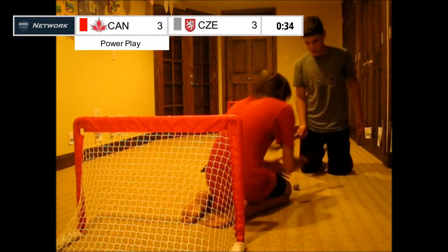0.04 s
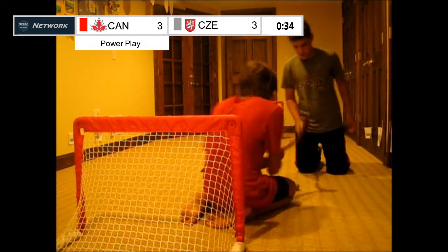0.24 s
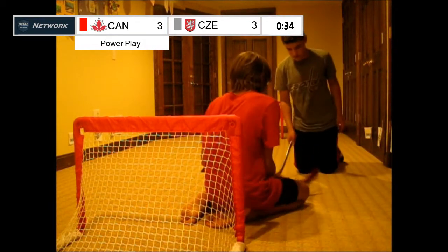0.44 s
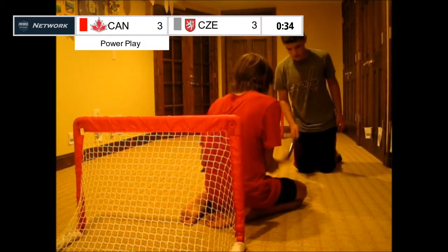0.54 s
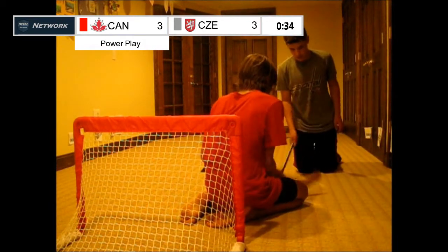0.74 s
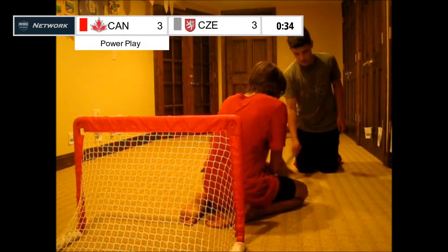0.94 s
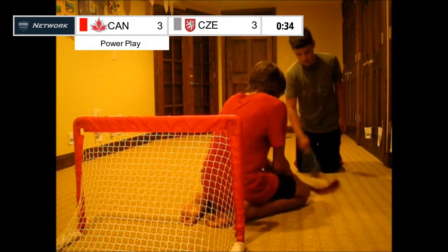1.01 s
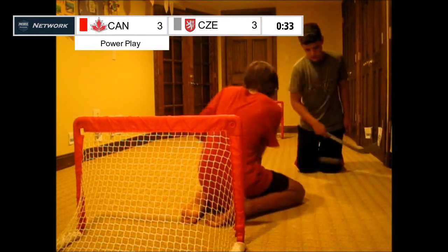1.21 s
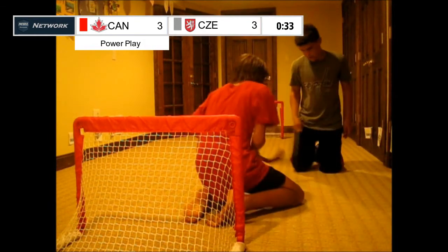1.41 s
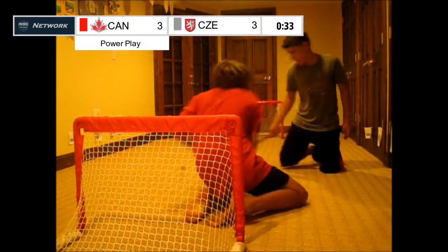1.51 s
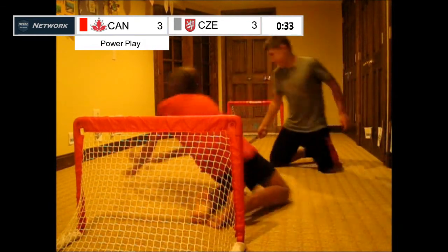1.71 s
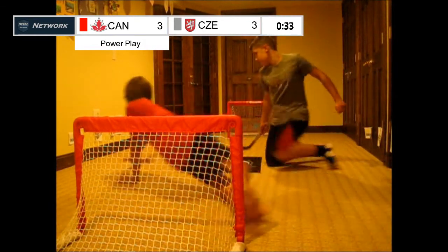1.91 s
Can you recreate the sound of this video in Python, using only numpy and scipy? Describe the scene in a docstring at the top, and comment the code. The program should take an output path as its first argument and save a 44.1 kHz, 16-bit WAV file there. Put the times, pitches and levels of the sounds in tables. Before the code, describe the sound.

Plastic sticks clack sharply four times, with soft thuds and shuffling on carpet.

```python
"""Knees shuffle on a carpeted hallway floor: two players fight for a small ball with plastic mini
hockey sticks. The sticks clack four times, the last with a rattling rebound, and tap once more;
each snap rings the plastic. In between, ball, blades and knees thud on the carpet and scrape it.
The hallway rings after each blow, and a gain control ducks after the loud clacks."""
import sys
import numpy as np
from scipy import signal
from scipy.fft import rfft, irfft, next_fast_len
from scipy.io import wavfile
from scipy.ndimage import uniform_filter1d, minimum_filter1d, map_coordinates

SR = 44100
rng = np.random.default_rng(int(sys.argv[2]) if len(sys.argv) > 2 else 0)


def dump(signal):
    """Clip the signal to [-1, 1] and save it as 16-bit WAV at the path in sys.argv[1]."""
    limited = np.clip(np.atleast_2d(signal).T, -1, 1)
    pcm = np.round(limited * 32767).astype(np.int16)
    wavfile.write(sys.argv[1], SR, pcm)


N = 85995


def amp(db):
    """Decibels to gain."""
    return 10 ** (np.asarray(db) / 20)


def unit_rms(x):
    """Scale to rms 1."""
    return x / np.sqrt(np.mean(x ** 2) + 1e-20)


def unit_energy(x):
    """Scale to energy 1."""
    return x / np.sqrt(np.sum(x ** 2) + 1e-20)


def curve(points, hz):
    """Interpolate (Hz, value) points on a log frequency axis."""
    freqs, values = np.transpose(points)
    return np.interp(np.log(hz + 1), np.log(freqs + 1), values)


def octaves(hz):
    """Tilt axis: about octaves above 4.5 kHz, flattening in the bass."""
    return np.log2((hz + 500) / 5000)


def decay(t, t60_s):
    """Exponential decay, 60 dB in t60_s."""
    return np.exp(-np.log(1000) * t / t60_s)


def damped_mode(t, hz, t60_s):
    """Decaying sine of random phase."""
    return np.sin(2 * np.pi * (hz * t + rng.random())) * decay(t, t60_s)


def add_blow(out, time_s, x):
    """Mix in a blow; energy 1 equals full scale for 2 ms."""
    i = round(time_s * SR)
    out[i:i + len(x)] += x[:N - i] * np.sqrt(.002 * SR)


def coloured(x, db_of_hz):
    """Minimum-phase filter with the given gain curve."""
    size = 2 * next_fast_len(len(x))
    cepstrum = irfft(np.log(amp(db_of_hz(np.fft.rfftfreq(size, 1 / SR)))))
    cepstrum[1:size // 2] *= 2
    cepstrum[size // 2 + 1:] = 0
    return irfft(rfft(x, size) * np.exp(rfft(cepstrum)), size)[:len(x)]


def shaped(x, spectrum):
    """Filter by a table of (Hz, dB) points."""
    return coloured(x, lambda hz: curve(spectrum, hz))


def friction(spectrum, rough_db, slip_hz):
    """Noise whose level jumps at random as the contact catches and slips."""
    grip = map_coordinates(rng.standard_normal(N), [np.arange(N) * slip_hz / SR], order=1)
    return unit_rms(shaped(rng.standard_normal(N) * amp(rough_db * grip), spectrum))


# Shuffle envelope (time [s], level [dB])
SHUFFLE_LEVELS = [(0, -36.5), (.2, -38.5), (.3, -38), (.4, -31), (.58, -40), (.78, -42.5), (.95, -43),
                  (1.0, -35.5), (1.2, -32.5), (1.38, -49), (1.6, -59.5), (1.72, -51.5), (1.81, -53),
                  (1.95, -47)]
# Rubbed carpet (frequency [Hz], level [dB])
CARPET_SPECTRUM = [(25, -16.5), (60, -4.5), (120, -5), (220, 3), (400, -5), (1000, -8.5), (2000, -15),
                   (4000, -23.5), (8000, -31.5), (15000, -40.5)]


def knee_shuffle():
    """Knees rub the carpet throughout, swelling and easing."""
    level_db = np.interp(np.arange(N) / SR, *np.transpose(SHUFFLE_LEVELS))
    return amp(level_db) * friction(CARPET_SPECTRUM, rough_db=1.5, slip_hz=90)


# Still room (frequency [Hz], level [dB])
AIR_SPECTRUM = [(25, -5.5), (100, 0.5), (200, -0.5), (500, -16), (1100, -9.5), (2000, -25), (6000, -26),
                (15000, -44.5)]


def room_air():
    """Faint, steady, mostly low noise."""
    return amp(-53) * unit_rms(shaped(rng.standard_normal(N), AIR_SPECTRUM))


# Resonances of each stick and of a blade slapping the ball (centre [Hz], width [Hz], level [dB])
STICK_A = [(1640, 150, -6), (2810, 220, -2), (3200, 170, 1), (3560, 160, -6), (4120, 170, -4),
           (4570, 170, 2), (4940, 160, 1), (5470, 240, -3.5), (6240, 220, -4), (6700, 220, -2),
           (7220, 180, -5), (7740, 200, -4), (8380, 220, -7), (9520, 280, -6), (10550, 320, -7),
           (11300, 320, -11)]
STICK_B = [(1780, 100, -4), (2220, 170, 2.5), (2910, 80, 3), (3730, 230, -1), (4130, 220, -6),
           (4600, 110, 1), (5130, 260, -1), (5560, 130, -1), (6060, 90, -3), (6690, 200, 1),
           (8090, 300, -1), (8700, 260, -6), (9300, 240, -3), (10230, 220, -2), (11680, 400, -6)]
BLADE = [(1100, 300, -6), (1750, 500, -6), (2300, 300, -4), (2700, 240, -1), (3070, 240, 0), (3850, 380, 0),
         (4490, 150, -1), (4820, 200, -1), (5780, 300, -3), (6850, 140, -2), (7350, 340, -3),
         (8650, 380, -1), (9850, 420, -7), (11250, 320, -9)]
# Struck pieces (body name: resonances)
BODIES = {"stick a": STICK_A, "stick b": STICK_B, "blade": BLADE}
# Plastic between its resonances (frequency [Hz], level [dB])
PLASTIC_BASE = [(200, -30), (1000, -17), (2200, -9.5), (3500, -8.5), (6500, -9.5), (10000, -7.5),
                (13500, -14.5), (16000, -24)]


def plastic_db(hz, modes):
    """Response of struck plastic: broad resonances on a weak base."""
    peaks = sum(amp(db) ** 2 / (1 + 2 * ((hz - centre) / width) ** 2) ** 2 for centre, width, db in modes)
    return 10 * np.log10(peaks + amp(curve(PLASTIC_BASE, hz)) ** 2)


# Low push of a clack (frequency [Hz], level [dB])
KNOCK_SPECTRUM = [(30, -17.5), (150, -17), (400, -2), (1000, 3.5), (1600, 0.5), (4000, -38)]
# Stick hits (time [s], level [dB], body, tilt [dB/oct], crack centre [Hz], knock [dB re hit],
# hallway [dB re hit], main ring [Hz], main ring [dB re hit])
CLACKS = [(0.2064, 3.5, "stick a", -0.5, 6600, -24.5, 6.5, 4910, -7.5),
          (0.6131, -5.5, "stick a", -1.1, 7400, -42, 5.5, 2947, -8),
          (0.9005, -6.5, "stick b", 0.5, 5700, -34.5, 6.5, 2206, -4.5),
          (1.0771, 0.5, "blade", -0.65, 8530, -10.5, 2.5, 3186, -9),
          (1.1, -14.5, "blade", -5.5, 3500, -26.5, 4.5, 2700, -24.5),
          (1.8981, -45.5, "stick a", -12, 2930, 0.5, 10.5, 3000, -12)]


def stick_clacks(crack_t60_s=0.0093, chatter_t60_s=0.13, ring_t60_s=0.08, partials_t60_s=0.35):
    """A snap with brief chatter and a low knock rings the plastic; the hallway answers."""
    out, t, impulse = np.zeros(N), np.arange(SR) / SR, signal.unit_impulse(SR)
    knock_shape = unit_energy(shaped(impulse, KNOCK_SPECTRUM))
    for time_s, level_db, body, tilt_db_oct, crack_hz, knock_db, hall_db, ring_hz, ring_db in CLACKS:
        modes = BODIES[body]

        def body_db(hz):
            return plastic_db(hz, modes) + tilt_db_oct * octaves(hz)

        def crack_db(hz, body_share=0.36, hump_db=12.5, half_width_oct=0.87):
            hump = hump_db / (1 + (np.log2((hz + 1) / crack_hz) / half_width_oct) ** 2)
            return body_share * body_db(hz) + (1 - body_share) * curve(PLASTIC_BASE, hz) + hump

        grit = amp(0.5) * unit_energy(rng.standard_normal(SR) * decay(t, crack_t60_s))
        crack = unit_energy(coloured(impulse + grit, crack_db))
        chatter = rng.standard_normal(SR) * decay(t, chatter_t60_s)
        rattle = amp(-3) * unit_energy(coloured(chatter, body_db))
        ring = amp(ring_db) * unit_energy(np.sin(2 * np.pi * ring_hz * t) * decay(t, ring_t60_s))
        knock = amp(knock_db) * knock_shape
        reverb = hallway(unit_energy(coloured(impulse, body_db)) + knock)
        partials = sum(amp(body_db(hz)) * damped_mode(t, hz, partials_t60_s) for hz, _, _ in modes)
        tail = amp(hall_db) * (reverb + amp(-10.5) * unit_energy(partials))
        add_blow(out, time_s, amp(level_db) * (crack + rattle + ring + knock + tail))
    return out


# Hallway decay (frequency [Hz], t60 [s])
HALL_T60 = [(100, 0.46), (500, 0.17), (1500, 0.29), (3000, 0.33), (6000, 0.33), (10000, 0.28),
            (15000, 0.21)]


def hallway(x, build_s=0.004):
    """Diffuse reverberation between the walls, drawn anew for each call."""
    hz, frame_s, bands = signal.stft(rng.standard_normal(SR), SR, nperseg=256)
    tail = signal.istft(bands * decay(frame_s, curve(HALL_T60, hz)[:, None]), SR, nperseg=256)[1]
    onset = 1 - np.exp(-np.arange(len(tail)) / SR / build_s)
    return signal.fftconvolve(x, unit_energy(tail * onset))[:len(x)]


# Standing waves of the hallway (frequency [Hz], level [dB], t60 [s])
HALL_MODES = [(241.5, 6, .36), (293.7, 2, .24), (352.5, 3, .38), (413, -5, .25), (499, 2, .28),
              (563, -4, .25), (690, -4, .25)]
# Ball, blade and knee on carpet (time [s], level [dB], low edge [Hz], high edge [Hz])
THUDS = [(0.41, -20.5, 288, 740), (0.435, -11, 224, 500), (0.463, -31, 254, 623), (0.81, -25.5, 272, 840),
         (.818, -24.5, 199, 444), (.838, -31.5, 248, 530), (1.146, -11, 523, 1083), (1.151, -9, 398, 770),
         (1.189, -25, 82, 162), (1.222, -25, 290, 800), (1.277, -43.5, 82.6, 127.3),
         (1.491, -38.5, 305, 466.4), (1.833, -35.5, 265, 425), (1.868, -41, 298, 576),
         (1.9, -32.5, 420, 740)]


def carpet_thuds():
    """A soft band-limited push and a faint scuff, heard mostly as the hallway's boom and tail."""
    out, t = np.zeros(N), np.arange(SR) / SR
    for time_s, level_db, low_hz, high_hz in THUDS:
        band = signal.butter(3, [low_hz, high_hz], 'bandpass', fs=SR, output='sos')
        push = unit_energy(signal.sosfilt(band, signal.unit_impulse(SR)))
        waves = sum(amp(db) * damped_mode(t, hz, t60_s) for hz, db, t60_s in HALL_MODES)
        boom = amp(0.5) * unit_energy(signal.sosfilt(band, waves))
        scuff = shaped(rng.standard_normal(SR) * decay(t, t60_s=0.049), SCRAPE_SPECTRUM)
        thud = push + amp(-31) * unit_energy(scuff)
        add_blow(out, time_s, amp(level_db) * (thud + boom + amp(6.5) * hallway(thud)))
    return out


# Scraped carpet, also a thud's scuff (frequency [Hz], level [dB])
SCRAPE_SPECTRUM = [(100, -25.5), (400, -11.5), (1100, -9.5), (1800, -9.5), (3500, -8.5), (8000, -12.5),
                   (15000, -25.5)]
# Strokes (time [s], length [s], level [dB], tilt [dB/oct], rise [s])
SCRAPES = [(1.025, 0.061, -25.5, -9.5, 0.014), (1.688, 0.35, -52.5, -3.5, 0.11),
           (1.802, 0.16, -49.5, -1.5, 0.027)]


def carpet_scrapes(fall_s=0.035):
    """Blades or clothes drag over the carpet in quick, rough strokes."""
    out, t = np.zeros(N), np.arange(N) / SR
    for time_s, length_s, level_db, tilt_db_oct, rise_s in SCRAPES:
        envelope = np.clip((t - time_s) / rise_s, 0, 1) * np.clip((time_s + length_s - t) / fall_s, 0, 1)
        rub = friction(SCRAPE_SPECTRUM, rough_db=3.0, slip_hz=340)
        out += amp(level_db) * envelope * unit_rms(coloured(rub, lambda hz: tilt_db_oct * octaves(hz)))
    return out + amp(-9.5) * hallway(out)


def scene():
    """The game over the still room, mono."""
    return (knee_shuffle() + room_air() + stick_clacks() + carpet_thuds() + carpet_scrapes())[None]


def record(dry):
    """Gain control ducks fast and recovers slowly; a peak limiter and a low-pass follow."""
    threshold_db, attack_s, recovery_db_per_s, cutoff_hz = -14, 0.0061, 31.5, 15900
    x = dry[0]
    level_db = 10 * np.log10(np.abs(uniform_filter1d(x ** 2, size=44)) + 1e-12)
    excess_db = np.maximum(level_db - threshold_db, 0)
    recovery_db = recovery_db_per_s * np.arange(N) / SR
    duck_db = np.maximum.accumulate(excess_db + recovery_db) - recovery_db
    pole = np.exp(-1 / (attack_s * SR))
    ducked = x * amp(-signal.lfilter([1 - pole], [1, -pole], duck_db))
    limiter_gain = minimum_filter1d(1 / np.maximum(np.abs(ducked), 1), size=31)
    limited = ducked * uniform_filter1d(limiter_gain, size=31)
    lowpass = signal.ellip(10, .1, 90, cutoff_hz, fs=SR, output='sos')
    return signal.sosfilt(lowpass, limited)[None]


dry = scene()
out = record(dry)
dump(out)
```